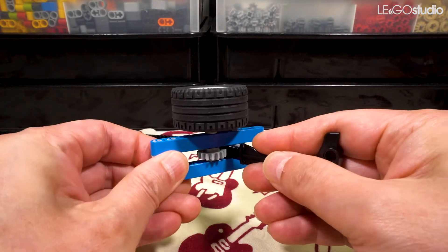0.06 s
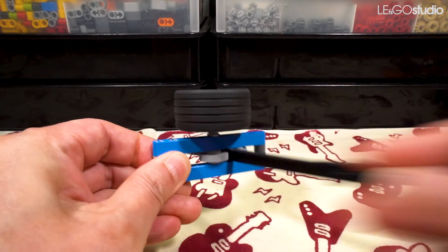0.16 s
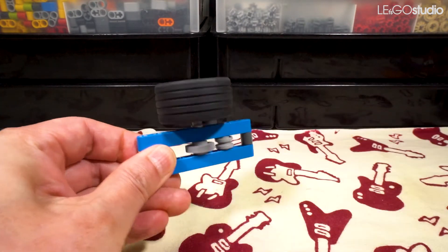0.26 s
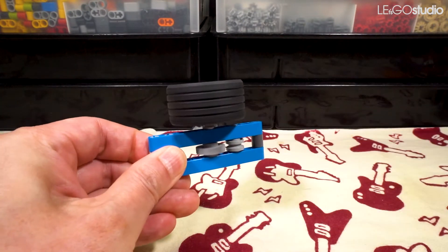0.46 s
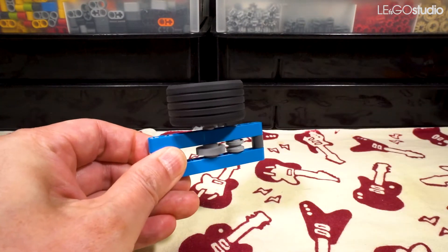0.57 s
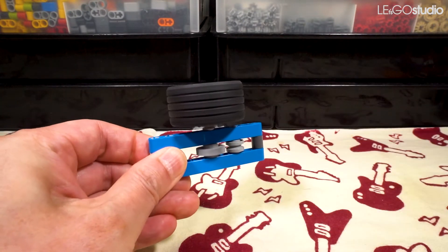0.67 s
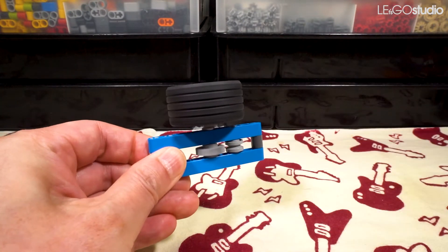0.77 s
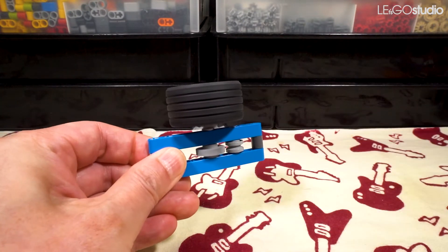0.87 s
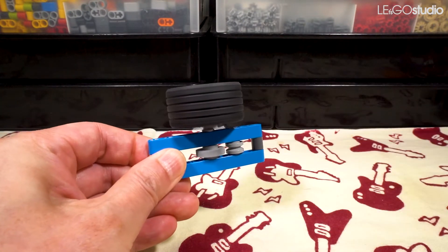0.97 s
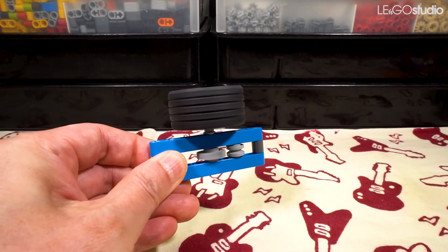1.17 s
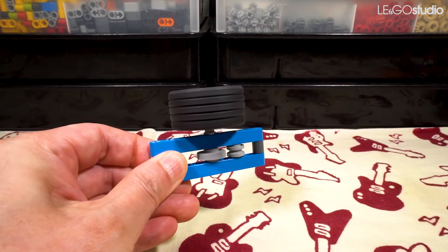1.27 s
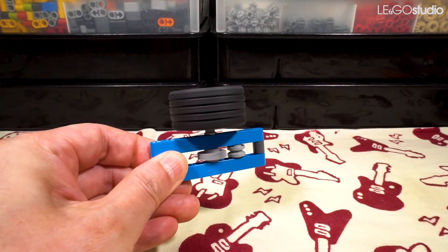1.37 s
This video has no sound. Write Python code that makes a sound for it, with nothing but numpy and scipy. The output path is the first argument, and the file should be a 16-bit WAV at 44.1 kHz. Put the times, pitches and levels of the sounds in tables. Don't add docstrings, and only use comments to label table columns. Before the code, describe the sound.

A plastic rip-cord zip through toy gears starts faintly at 0.18 s, swells and climbs to a harsh peak by 0.28 s. The driven wheel whirs from then on, a dry, rapidly fluttering buzz, slowing slightly. At 0.38 s a bright ringing snap and duller clatter hit at right. Irregular sharp ticks follow from 0.56 s; a soft low knock comes near 1.22 s. Quiet room hum, short echoes, close pickup.

```python
import sys
import numpy as np
from scipy import signal
from scipy.fft import rfft, irfft
from scipy.io import wavfile

SR = 44100
rng = np.random.default_rng(int(sys.argv[2]) if len(sys.argv) > 2 else 0)


def decibels_to_gain(level_db):
    exponent = np.asarray(level_db, float) / 20
    return 10 ** exponent


def inscribe(sig):
    pcm = np.round(np.clip(np.atleast_2d(sig).T, -1, 1) * 32767)
    wavfile.write(sys.argv[1], SR, pcm.astype(np.int16))


N = 61739

# pitch_hz, level_db (per Hz)
HUM_COLOUR = [(28, -20), (45, -7.5), (110, -1.5), (200, -1), (330, -8), (700, -10), (2500, -27),
              (16000, -37)]
# pitch_hz, side_minus_mid_db
HUM_SIDE = [(40, -32), (125, -31.5), (300, -14), (1000, -3.5), (15000, 2.5)]
# pitch_hz, side_minus_mid_db
NEAR_SIDE = [(60, -32), (180, -13), (550, -20), (1650, -10), (4970, -3.5), (15000, -4)]
# pitch_hz, fade_s
ROOM_FADE = [(300, 0.31), (2000, 0.48), (7000, 0.61), (14000, 0.55)]
# start_s, level_db
KNOCKS = [
    (1.224, -39),
]
# pitch_hz, level_db, fade_s
KNOCK_MODES = [(258, -2, .25), (291, -1.5, .22), (170, -9, .2), (345, -8, .1), (430, -8, .1),
               (560, -10, .08), (750, -8, .08)]
# start_s, level_db
SNAPS = [
    (.3764, -6),
    (.3773, -6.5),
    (.3815, -20),
    (.3842, -17),
    (.387, -20),
]
# pitch_hz, level_db, fade_s
SNAP_MODES = [(10150, -28, .2), (10265, -12, .08), (10373, -22, .28), (10640, -20, .11), (10480, -7, .025),
              (11320, -26, .12)]
# start_s, level_db
CLATTER = [
    (.379, -33),
    (.3805, -16),
    (.382, -18),
    (.385, -33.5),
    (.388, -35),
    (.393, -20.5),
    (.397, -23.5),
    (.402, -33),
    (.41, -32),
]
# pitch_hz, level_db, fade_s
CLATTER_MODES = [(930, -6, .1), (985, -5, .1), (1044, -3, .15), (1120, -8, .06), (1330, -6, .04),
                 (1650, -8, .03), (1950, -8, .04), (2120, -5, .05), (2288, -5, .1), (2600, -6, .04),
                 (3500, -5, .015), (4200, -4, .012), (5800, -5, .01)]
# start_s, level_db
SPIN = [
    (.27, -88),
    (.29, -42),
    (.45, -42),
    (.53, -45),
    (.58, -42.5),
    (.9, -41.5),
    (1.4, -43),
]
# pitch_hz, width_hz, level_db
GEAR_BODY = [(816, 240, 3), (1514, 127, 1), (1757, 220, -3), (3496, 270, -2), (4400, 106, -2.5),
             (5130, 150, -5.5), (6910, 330, -2.5), (7340, 350, 0.5), (8000, 920, -3), (9080, 240, -2),
             (10010, 180, 5), (11330, 160, -10), (15000, 900, 3)]
# pitch_hz, level_db
GEAR_COLOUR = [(300, -17.5), (760, -2.5), (1150, -6.5), (1700, -2.5), (5700, 0), (7200, -3.5), (12500, -8),
               (16000, -22)]
# start_s, peak_db
TICKS = [(0.5642, -29), (0.6395, -57), (0.6999, -32), (0.7587, -42), (0.7752, -30), (0.8366, -43),
         (0.8974, -40), (0.9139, -30), (0.9603, -42), (0.9748, -28.5), (1.0216, -32), (1.1, -27),
         (1.1479, -32), (1.2591, -29)]
# start_s, level_db, teeth_hz
PULL = [
    (.177, -66, 300),
    (.182, -47, 420),
    (.206, -40, 1000),
    (.213, -28, 1600),
    (.239, -28, 1700),
    (.245, -23, 1900),
    (.267, -18, 5600),
    (.282, -17.5, 7200),
    (.287, -45, 7200),
]
# pitch_hz, width_hz, level_db
CORD_BODY = [(874, 206, 3), (1560, 67, -8), (4400, 340, -5.5), (6040, 75, -7), (6880, 330, -4.5),
             (9840, 135, -4.5), (10100, 130, -5), (12500, 540, -6.5), (12380, 220, -5)]
# pitch_hz, level_db (per Hz)
CORD_COLOUR = [(100, -35), (250, -11), (600, -9.5), (830, -6), (1100, -6.5), (1500, -0.5), (4300, 5.5),
               (16000, -3)]
# start_s, level_db
JOLTS = [
    (.181, -41),
    (.245, -35.5),
    (.262, -32.5),
    (.275, -36),
]
# pitch_hz, level_db, fade_s
FRAME_MODES = [(212, -9.5, 0.082), (291, -6, 0.049), (437, -8.5, 0.067), (742, -6, 0.077), (850, 1.5, 0.07),
               (946, -12, 0.069)]


def rms_one(x):
    return x / np.sqrt(np.mean(x ** 2) + 1e-20)


def in_time(rows):
    s, *columns = np.transpose(rows)
    return [np.interp(np.arange(N) / SR, s, column) for column in columns]


def at_hz(points, hz):
    table_hz, values = np.transpose(points)
    return np.interp(np.log(hz + 1), np.log(table_hz), values)


def colour(x, points):
    return irfft(rfft(x) * decibels_to_gain(at_hz(points, np.fft.rfftfreq(N, 1 / SR))), N)


def high_pass(x, hz):
    return signal.sosfilt(signal.butter(2, hz, "high", fs=SR, output="sos"), x)


def drift(rate_hz):
    r = np.exp(-2 * np.pi * rate_hz / SR)
    wander = signal.lfilter([1], [1, -2 * r, r * r], rng.standard_normal(N + SR))
    return rms_one(wander[SR:])


def ring(clicks, hz, fade_s):
    r = decibels_to_gain(-60 / (fade_s * SR))
    w = 2 * np.pi * hz / SR
    return signal.lfilter([0, np.sin(w)], [1, -2 * r * np.cos(w), r * r], clicks + 1e-18)


def body(x, peaks, broad_db, widen=1.0, patch_db=0.0):
    out = decibels_to_gain(broad_db) * x
    for hz, width_hz, db in peaks:
        r = np.exp(-np.pi * width_hz * widen / SR)
        gain = (1 - r * r) / 2
        rung = signal.lfilter([gain, 0, -gain], [1, -2 * r * np.cos(2 * np.pi * hz / SR), r * r], x)
        out = out + decibels_to_gain(db + patch_db * drift(34)) * rung
    return out


def strikes(rows):
    s, db = np.transpose(rows)
    out = np.zeros(N)
    out[(s * SR).astype(int)] = decibels_to_gain(db)
    return out


def struck(rows, modes, soften=0.0):
    softness = np.clip(soften, 0, .99)
    hits = signal.lfilter([1], [1, -softness], strikes(rows)) * (1 - soften)
    out = np.zeros(N)
    for k, (hz, db, fade_s) in enumerate(modes):
        out = out + (-1) ** k * decibels_to_gain(db) * ring(hits * decibels_to_gain(drift(300)), hz, fade_s)
    return out


def spread(mid, other, side_db):
    return mid + colour(other, side_db) * [[1], [-1]]


def hum():
    mid, other = rms_one(colour(rng.standard_normal((2, N)), HUM_COLOUR))
    level_db = -51 + drift(5.7) / 2
    return decibels_to_gain(level_db) * spread(mid, other, HUM_SIDE)


def room(x):
    gap_s = 0.0094
    t = np.arange(N) / SR
    tail = 0
    for low in 100 * 2. ** np.arange(0, 8):
        band = signal.butter(2, [low, min(2 * low, .45 * SR)], "band", fs=SR, output="sos")
        noise = signal.sosfilt(band, rng.standard_normal((2, N)))
        tail = tail + noise * decibels_to_gain(-60 * t / at_hz(ROOM_FADE, low * np.sqrt(2)))
    tail = tail * np.clip(t / gap_s - 1, 0, 1)
    tail = tail / np.sqrt(np.sum(tail ** 2) / 2)
    return signal.fftconvolve(x[None], tail, axes=1)[:, :N]


def knock():
    deeper = struck([(1.092, -43)], [(150, 0, .08), (95, -2, .08)], soften=.9)
    return struck(KNOCKS, KNOCK_MODES, soften=.9) + deeper


def snap():
    age_s = np.arange(200) / SR
    burst = rng.standard_normal(200) * decibels_to_gain(-60 * age_s / .004)
    crack = high_pass(np.convolve(strikes(SNAPS), burst)[:N], 6000.0)
    hit = strikes(SNAPS[1:2])
    rings = sum(decibels_to_gain(db) * ring(hit, hz, fade_s) for hz, db, fade_s in SNAP_MODES)
    clatter = high_pass(struck(CLATTER, CLATTER_MODES), 700.0)
    return rings + decibels_to_gain(4.0) * crack, decibels_to_gain(-11.5) * clatter


def wheel():
    turns_hz, slowing_hz_per_s, first_turn_s = 70.4, 6.2, .5642
    throb_db, throb_fade = 9, 9.9
    grains_per_s, grain_spread_db = 9000, 2.2
    level_db, = in_time(SPIN)
    t = np.arange(N) / SR
    turn = turns_hz * (t - first_turn_s) - slowing_hz_per_s * (t * t - first_turn_s ** 2) / 2
    jar = rng.uniform(.3, 1.3, 200)[np.floor(turn).astype(int) + 100]
    throb = decibels_to_gain(throb_db * jar * np.exp(-throb_fade * (turn % 1)))
    sizes = decibels_to_gain(grain_spread_db * np.minimum(rng.exponential(1, (2, N)), 5))
    sizes = sizes * rng.choice([-1, 1], (2, N))
    grains = throb * sizes * (rng.random((2, N)) < grains_per_s / SR)
    whir = body(grains, GEAR_BODY, broad_db=-4.0, widen=1.1, patch_db=1.0)
    whir = rms_one(colour(whir, GEAR_COLOUR))
    puffs = rng.standard_normal((2, 600)) * decibels_to_gain(-60 * np.arange(600) / SR / .01)
    puffs = high_pass(puffs, 11000.0)
    ticks = np.array([np.convolve(strikes(TICKS), puff)[:N] for puff in puffs])
    return decibels_to_gain(level_db) * whir * (t > SPIN[0][0]) + decibels_to_gain(-3.0) * ticks


def cord():
    tooth_jitter, tooth_spread_db = .11, 3.5
    whine_db, chatter_db = -13.0, 4
    pull_db, lump_db, brighten_db_per_octave = 0.5, 1.8, 2.5
    level_db, teeth_hz = in_time(PULL)
    unevenness = tooth_jitter * rng.standard_normal(N) * np.sqrt(SR / teeth_hz)
    phase = np.cumsum(teeth_hz * (1 + unevenness)) / SR
    teeth = np.diff(np.floor(np.maximum.accumulate(phase)), prepend=0)
    teeth = teeth * decibels_to_gain(tooth_spread_db * rng.standard_normal(N)) * np.sqrt(SR / teeth_hz)
    chatter = rng.standard_normal((2, N))
    whine = decibels_to_gain(whine_db + 7.6 * drift(140)) * np.sin(2 * np.pi * phase)
    whine = whine * np.clip(teeth_hz / 2500 - .5, 0, 1)
    force = np.array([rms_one(teeth) + whine + decibels_to_gain(chatter_db) * chatter[0], chatter[1]])
    t = np.arange(N) / SR
    level = decibels_to_gain(level_db + pull_db + lump_db * drift(203))
    level = level * (t > PULL[0][0]) * (t < PULL[-1][0])
    sound = colour(body(force, CORD_BODY, broad_db=-3.0, widen=0.9), CORD_COLOUR)
    brightness = decibels_to_gain(brighten_db_per_octave * np.log2(teeth_hz / 2000))
    brightened = sound + high_pass(sound, 9000.0) * (brightness - 1)
    zip_sound = level * brightened / np.std(sound[0])
    return zip_sound + [struck(JOLTS, FRAME_MODES, soften=0.76), np.zeros(N)]


def scene():
    pull = cord()
    spin = wheel()
    hit, clatter = snap()
    near = spread(pull[0], decibels_to_gain(7.5) * pull[1], NEAR_SIDE) * decibels_to_gain([[-.8], [.8]])
    near = near + spread(*spin, NEAR_SIDE) * decibels_to_gain([[-.3], [.3]])
    into_room = decibels_to_gain(-7) * pull[0] + decibels_to_gain(-13.0) * hit + decibels_to_gain(-1.5) * clatter + decibels_to_gain(-12.0) * spin[0]
    wet = room(into_room)
    mid, side = wet.mean(0), (wet[0] - wet[1]) / 2
    echoes = spread(mid, decibels_to_gain(6.0) * side, NEAR_SIDE)
    right = hit * decibels_to_gain([[-12.0], [0]]) + clatter * decibels_to_gain([[-5.0], [0]])
    return near + echoes + right + knock() + hum()


def band_limit(x):
    return signal.sosfilt(signal.butter(12, 16980, fs=SR, output="sos"), x)


def record(dry):
    top_hz = 15760
    mix = irfft(rfft(dry) * (np.fft.rfftfreq(N, 1 / SR) < top_hz), N)
    return band_limit(mix)


dry = scene()
out = record(dry)
inscribe(out)
```